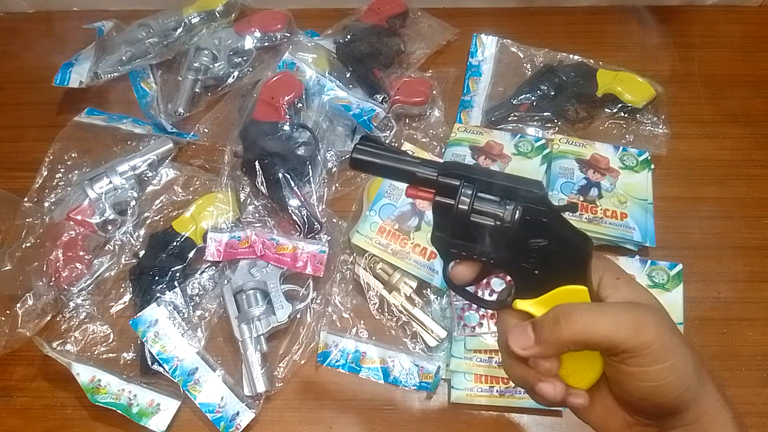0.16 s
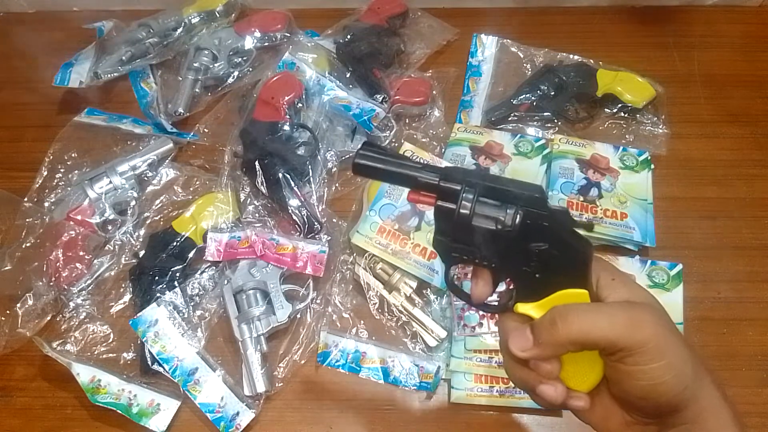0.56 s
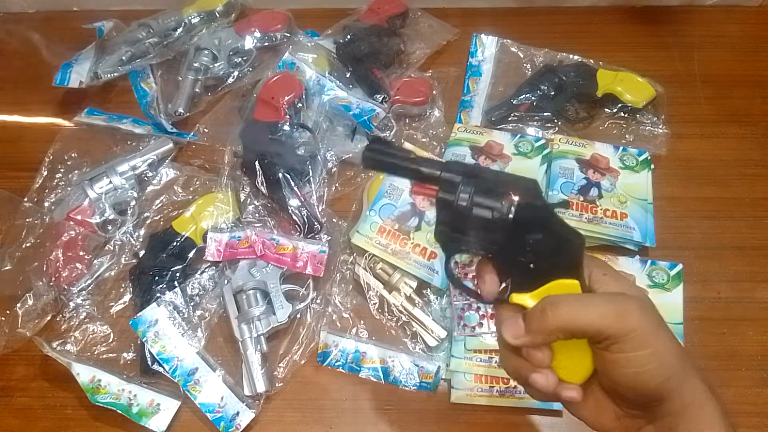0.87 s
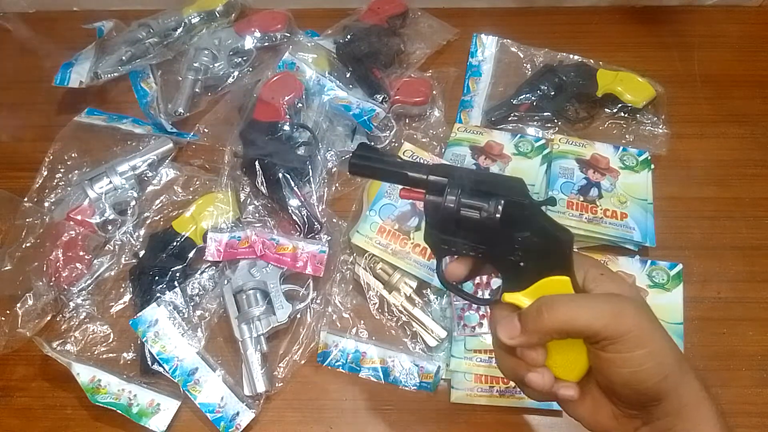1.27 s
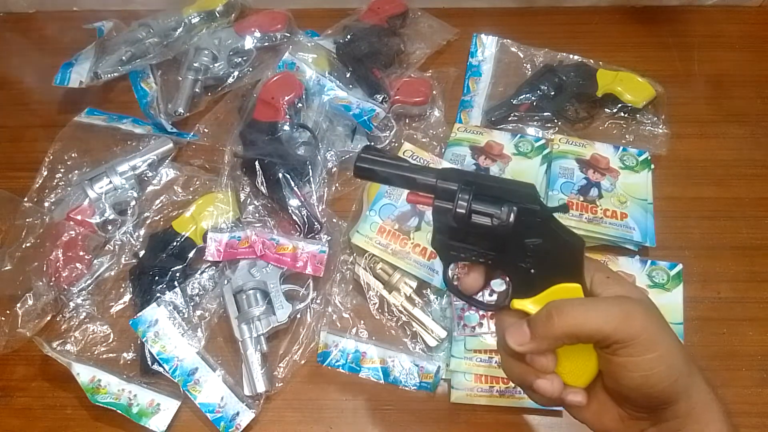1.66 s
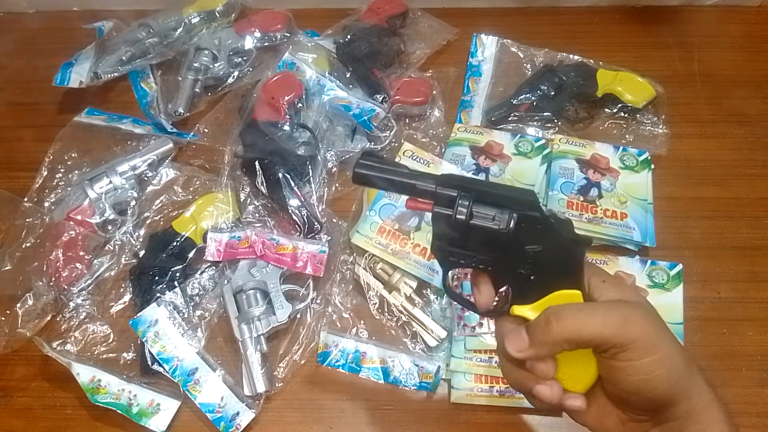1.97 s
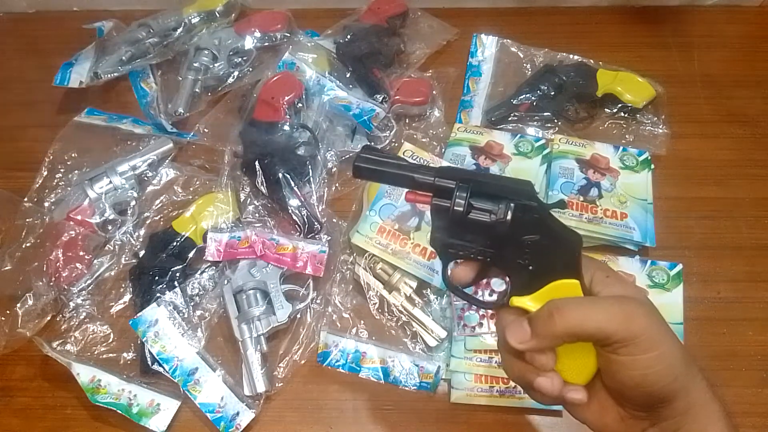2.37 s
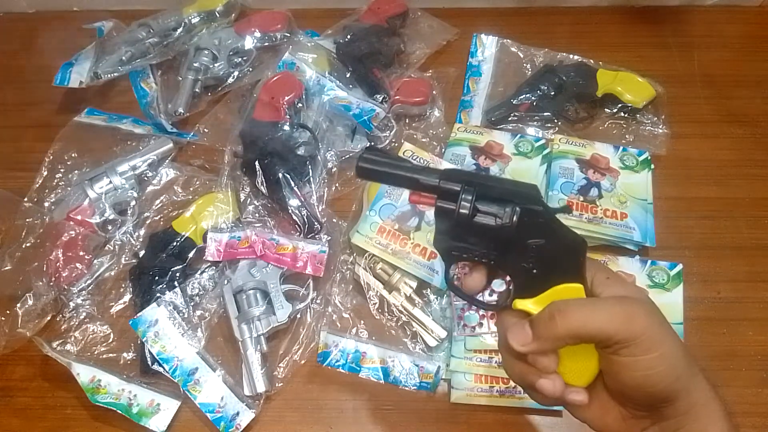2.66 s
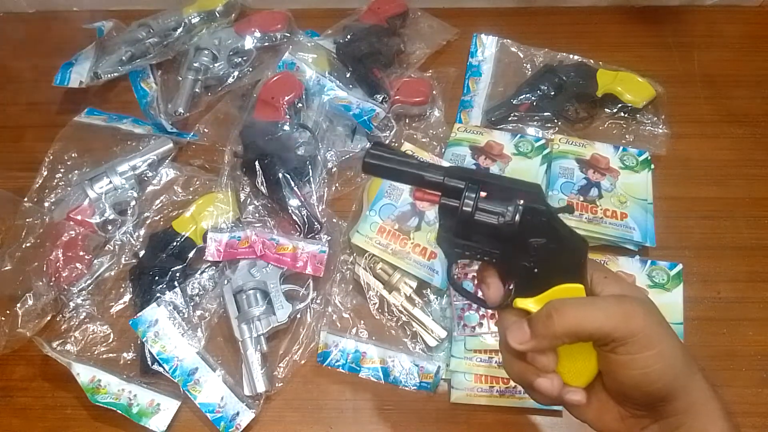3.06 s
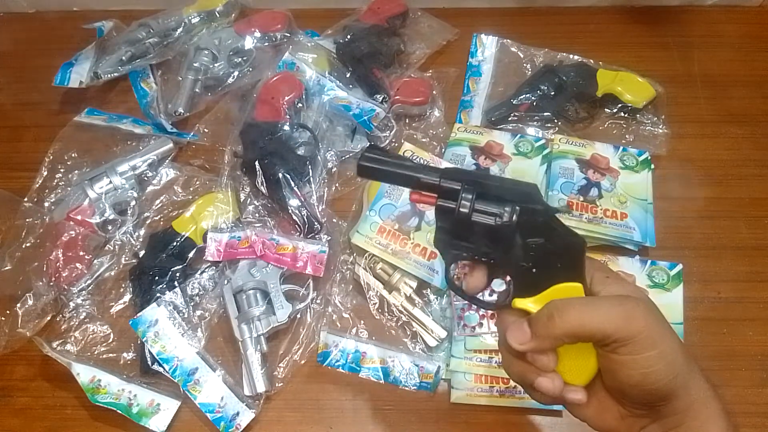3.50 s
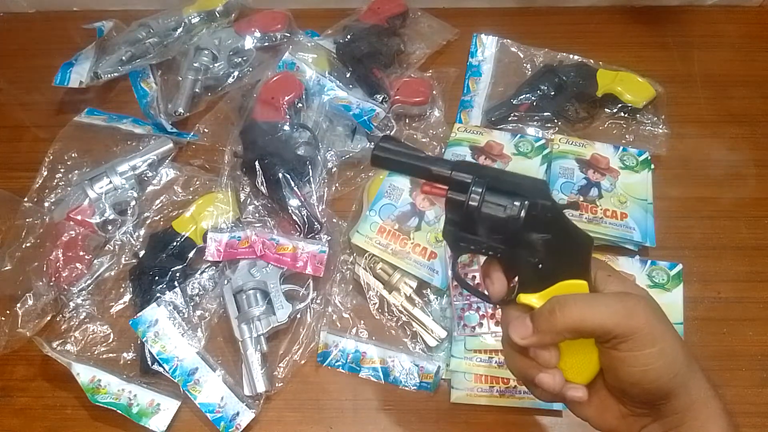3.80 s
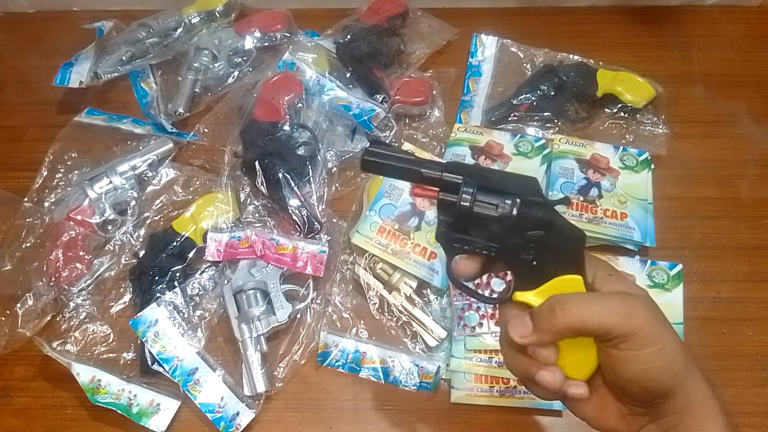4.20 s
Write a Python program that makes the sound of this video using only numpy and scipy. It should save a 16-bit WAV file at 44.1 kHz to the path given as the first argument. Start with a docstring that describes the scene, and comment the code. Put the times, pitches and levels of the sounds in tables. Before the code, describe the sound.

A plastic toy cap revolver fires sharp, hissy bangs about once a second, with trigger clicks between them in a small echoing room.

```python
"""A plastic toy revolver fires ring caps close to the microphone, in a small hard-walled room.
Each cap flares as shaped noise: a sudden one cracks, a slow one swells, and a puff of gas pushes the air.
Hammer, trigger, pawl and cylinder click as struck modes with gritty contact noise; the hand rubs the grip.
The room answers with noise that leaks away band by band; low drone, room noise and faint tones lie beneath."""
import sys
import numpy as np
from scipy import signal
from scipy.fft import rfft, irfft, next_fast_len
from scipy.io import wavfile

SR = 44100
rng = np.random.default_rng(int(sys.argv[2]) if len(sys.argv) > 2 else 0)


def dump_mix(stems):
    """Bounce the given channels to the path in sys.argv[1] as a 16-bit WAV at rate SR."""
    frames = np.atleast_2d(stems).T  # one column per channel
    limited = np.clip(frames, -1, 1)  # hard clip at full scale
    pcm = np.round(limited * 32767).astype(np.int16)
    wavfile.write(sys.argv[1], SR, pcm)


N = 191526

# Spectra give relative levels per Hz; part modes are relative to the strike.
# caps firing: start_s, burn_s, hiss_db, roar_db, suddenness_db (opening burst over hiss), puff_db, puff_hz
CAPS = [(-0.064, 0.079, -32.5, -29.5, 13.5, -35.5, 60), (0.968, 0.055, -27.5, -25, 10, -12, 88),
        (2.1161, 0.11, -30, -22, 4.5, -10.5, 55), (3.148, 0.064, -36, -45.5, 17, -26.5, 68),
        (3.8843, 0.068, -28, -26.5, -0.5, -23, 33.2)]
# flame hiss, which also colours the room's answer: pitch_hz, level_db
HISS = [(200, -24.5), (500, -16), (760, -11), (1000, -3), (2200, -4), (3300, 4), (4300, -3), (6000, 0.5),
        (8200, -2), (9200, -5.5), (10200, -13), (13000, -12), (16000, -9.5)]
# flame roar: pitch_hz, level_db
ROAR = [(150, -18), (310, -7.5), (400, -11.5), (750, -7.5), (1000, -9.5), (1400, -1), (1900, -6),
        (2500, -8.5), (3500, -16), (4500, -20), (8000, -26), (16000, -32)]
# big eddies of the flame: pitch_hz, level_db
RUMBLE = [(20, 2.5), (60, 1), (120, -2), (250, -8), (500, -11), (800, -11.5), (2000, -32.5), (8000, -55)]
# the cap's cup bursting: pitch_hz, level_db
BURST = [(60, -4.5), (140, 3), (230, -13), (420, 3), (750, -13.5), (1200, 5), (1700, -5.5), (3000, -16),
         (8000, -22.5), (16000, -29)]
# hollows of the barrel, drum and grip: pitch_hz, width_hz, lift_db
HOLLOWS = [(457, 41, 2.5), (977, 84, 3), (1300, 340, 0.5), (2340, 150, 1.5), (3596, 180, 2.5),
           (5070, 760, 1), (7400, 320, 0), (7800, 300, 0.5)]
# standing waves of the room: pitch_hz, lift_db
ROOM_MODES = [(281, 4.5), (724, 5.5), (934, 8), (1044, 5.5), (1180, 4.5), (1302, 8), (1400, 4.5),
              (1545, 1.5), (1600, -4), (1784, 1.5), (2154, 10), (2324, 4.5), (2476, 2.5), (2517, 3.5),
              (2906, 1.5), (3088, 3.5), (3288, 3), (3545, 6)]
# the hammer trips: start_s, level_db
HAMMER_TRIPS = [(0.9441, -26), (2.0946, -30), (3.1370, -30.5), (3.8606, -36.5)]
# the hammer and its spring: pitch_hz, level_db, t60_s
HAMMER_MODES = [(2960, -1, 0.021), (3040, -2, 0.014), (4540, -12, .012), (4630, -16, 0.019),
                (6400, -21.5, 0.009), (7700, -20.5, 0.0068)]
# the trigger snaps back: start_s
TRIGGER_S = [0.1338, 1.2103, 2.3713, 3.3624, 4.1171]
# the plastic frame: pitch_hz, level_db, t60_s
FRAME_MODES = [(776, -28.5, 0.033), (1120, -19.5, 0.05), (1325, -22.5, 0.067), (2347, -12, .03),
               (2720, -13.5, 0.043), (3040, -7.5, 0.017), (3476, -13.5, 0.062), (3220, -33, 0.4),
               (3240, -31.5, 0.46), (3510, -34.5, 0.33), (4700, -11.5, 0.02), (7750, -7.5, 0.0085),
               (8030, -12, 0.01)]
# the pawl slides over the ratchet: start_s, level_db
PAWL_SLIPS = [(1.1672, -35.5), (1.887, -66), (2.7452, -63), (3.3064, -31.5), (3.5665, -51.5)]
# the pawl: pitch_hz, level_db, t60_s
PAWL_MODES = [(2600, -3, 0.016), (2980, -7, 0.028), (3420, -14, 0.011), (4400, -14.5, .01)]
# the cylinder locks on the next cap: start_s, level_db
CYLINDER_LOCKS = [(0.6732, -57), (2.8372, -55), (3.6444, -40.5)]
# the cylinder: pitch_hz, level_db, t60_s
CYLINDER_MODES = [(610, -26, 0.014), (1160, -19, 0.026), (2580, -3, 0.033), (2730, -4.5, 0.031),
                  (2680, -22.5, 0.28), (2830, -21.5, 0.018), (4500, -11, 0.016), (6430, -10, 0.0084),
                  (8250, -10, 0.0084)]
# plastic grating on plastic: pitch_hz, level_db
CONTACT = [(200, -29.5), (600, -11.5), (1100, -1), (2000, -2.5), (3000, 7.5), (4500, 0.5), (8300, -4),
           (10300, -18), (16000, -14)]
# the hand rubs on the grip during a slow pull: start_s, length_s, level_db
GRIP_RUBS = [(0.672, 0.3, -67.5), (2.844, 0.365, -73)]
# the rubbing: pitch_hz, level_db
RUB = [(20, 8), (70, 2), (150, -12), (300, -12), (650, -14), (1300, -16), (2000, -27), (3200, -29),
       (5000, -41.5), (16000, -50.5)]
# decay of the room: pitch_hz, t60_s
ROOM_T60 = [(120, 1.02), (400, 0.65), (800, 0.387), (1300, 0.4563), (1900, 0.4769), (2800, 0.3659),
            (3300, 0.375), (4300, 0.41), (8200, 0.368), (11000, 0.4), (16000, 0.18)]
# reverberant sound against the direct: pitch_hz, level_db
ROOM_DB = [(120, -16.5), (400, -13.5), (700, -7), (1000, -5.5), (3000, -2), (8000, 1.5), (16000, 3)]
# faint tones somewhere in the room: start_s, length_s, pitch_hz, level_db
TONES = [(1.317, 0.11, 564, -68.5), (2.893, 0.35, 638, -81)]
# the room's lowest modes: pitch_hz, level_db (relative), t60_s
LOW_MODES = [(67.57, -6.5, .5), (129, -5.5, 0.43), (142, -4, 0.66), (180, -11, 0.48), (219, -18, 0.49)]
# room noise: pitch_hz, level_db
AMBIENCE = [(20, -1), (65, 0), (100, -3.5), (150, -1.5), (200, -11), (260, -18.5), (420, -20), (620, -20.5),
            (1300, -22.5), (1900, -31), (3200, -38.5), (4200, -47), (16000, -56)]

LEAD = SR // 5   # samples run before the take is heard, so the first cap can fire ahead of it
TIME = (np.arange(N + LEAD) - LEAD) / SR
SIZE = next_fast_len(len(TIME), True)
HZ = np.maximum(np.arange(SIZE // 2 + 1) * SR / SIZE, 1)

CRACK_DB, CRACK_DB_PER_DB = -10, 0.7843   # crack over the flame at suddenness 0, and its growth
RUMBLE_DB, RUMBLE_DB_PER_DB = 3.5, .25   # eddies over the roar at puff level 0 dB, and their growth
PUFF_SWELL_CYCLES, PUFF_EARLY_S = 0.24, 0.0026   # time to the swell's peak; start ahead of the crack
IGNITION_S, HAMMER_FALL_DB = .0037, -33.5   # the hammer lands this long before each cap fires
TRIGGER_DB = -22   # always the force of its spring
PAWL_LEAD_S, PAWL_LEAD_DB = 0.043, -3.5   # the pawl brushes the tooth before, relative to its drop
PAWL_BOUNCE_S, PAWL_BOUNCE_DB = 0.0076, -2   # and bounces once
CATCH_LEAD_S, CATCH_DB = 0.0039, -15   # the catch grazes the cylinder before it locks
GRIP_EDGE_S = 0.015
MODE_WIDTH_HZ = 13   # of the room's standing waves
BACKGROUND_DB = -69.5   # rms of the steady room noise
CUTOFF_HZ = 16000


def from_db(db):
    """Decibels to gain."""
    return 10 ** (np.asarray(db) / 20)


def at_hz(points, hz):
    """Read a table on a log-frequency axis."""
    f, value = np.transpose(points)
    return np.interp(np.log(np.maximum(hz, 1)), np.log(f), value)


def noise(gain):
    """Steady noise of rms 1 with a given gain at each frequency."""
    shaped = rfft(rng.standard_normal(SIZE)) * gain
    x = irfft(shaped, SIZE)[:len(TIME)]
    return x / np.sqrt(np.mean(x ** 2) + 1e-20)


def coloured(spectrum, lift=1):
    """Noise of rms 1 with a tabled spectrum, times an extra gain by frequency."""
    return noise(lift * from_db(at_hz(spectrum, HZ)))


def dying(start, t60):
    """Envelope that jumps to 1 and falls 60 dB in t60 seconds."""
    age = TIME - start
    return (age >= 0) * np.exp(-np.clip(age * np.log(1000) / t60, 0, 40))


def held(start, length, edge_s):
    """Envelope that fades in, holds at 1 and fades out."""
    to_nearest_end = np.minimum(TIME - start, start + length - TIME)
    return np.clip(to_nearest_end / edge_s, 0, 1)


def resonances():
    """Gain by frequency of the gun's hollows and the room's narrow standing waves."""
    bumps = HOLLOWS + [(hz, MODE_WIDTH_HZ, db) for hz, db in ROOM_MODES]
    return from_db(sum(db / (1 + (2 * (HZ - hz) / width) ** 2) for hz, width, db in bumps))


def flares(lift, crack_t60, fade_t60, sputter_db, burst_t60, rumble_t60):
    """A cap bursts, then its flame hisses and roars out of the cylinder until the powder is spent."""
    hiss, roar = coloured(HISS, lift), coloured(ROAR, lift)
    rumble, burst = coloured(RUMBLE, lift), coloured(BURST, lift)
    sputter = from_db(sputter_db * noise(HZ < 300))
    out = 0
    for s, burn, hiss_db, roar_db, sudden_db, puff_db, _ in CAPS:
        crack_db = CRACK_DB + CRACK_DB_PER_DB * sudden_db
        burst_db = hiss_db + sudden_db
        # a stronger puff stirs more eddies
        rumble_db = roar_db + RUMBLE_DB + RUMBLE_DB_PER_DB * puff_db
        burning = (TIME >= s) & (TIME < s + burn)
        flame = sputter * burning + dying(s + burn, fade_t60)
        # above 0 dB the flame opens with a crack, below it swells up
        flame = flame * (1 + (from_db(crack_db) - 1) * dying(s, crack_t60))
        # the big eddies are spent first
        eddies = from_db(rumble_db) * dying(s, rumble_t60) * rumble
        out = out + flame * (from_db(hiss_db) * hiss + from_db(roar_db) * roar + eddies)
        out = out + from_db(burst_db) * dying(s, burst_t60) * burst
    return out


def puffs():
    """Expanding gas pushes on the microphone just ahead of the crack, and a suction follows."""
    out = 0
    for s, *_, db, hz in CAPS:
        cycles = np.clip(TIME - s + PUFF_EARLY_S, 0, .5) * hz
        swell = cycles / PUFF_SWELL_CYCLES
        envelope = swell * np.exp(1 - swell)
        out = out + from_db(db) * envelope * np.sin(2 * np.pi * cycles)
    return out


def ring(force, hz, t60):
    """Damped resonator: a unit click sets a sine ringing from height 1."""
    r = np.exp(-np.log(1000) / (t60 * SR))
    w = 2 * np.pi * hz / SR
    return signal.lfilter([0, np.sin(w)], [1, -2 * r * np.cos(w), r * r], force + 1e-18)


def strikes(events, modes, grit_db, grit_t60):
    """Each contact rings the part's modes, with a brief gritty chatter of plastic on plastic."""
    times, levels = np.transpose(events)
    at = np.round(times * SR).astype(int) + LEAD
    # every mode is struck about 1 dB harder or softer each time
    strengths = from_db(levels[:, None] + rng.standard_normal((len(events), len(modes))))
    chatter = sum(from_db(db) * dying(s, grit_t60) for s, db in events)
    out = from_db(grit_db) * coloured(CONTACT) * chatter
    for k, (hz, db, t60) in enumerate(modes):
        force = np.zeros(len(TIME))
        # neighbouring modes swing in opposite senses
        force[at] = strengths[:, k] * from_db(db) * (-1) ** k
        out = out + ring(force, hz, t60)
    return out


def hammer_blows():
    """The hammer trips, and lands just before each cap fires."""
    falls = [(s - IGNITION_S, HAMMER_FALL_DB) for s, *_ in CAPS]
    return list(HAMMER_TRIPS) + falls


def trigger_snaps():
    """The spring throws the trigger back against the frame with the same force each time."""
    return [(s, TRIGGER_DB) for s in TRIGGER_S]


def pawl_ticks():
    """Each slip of the pawl is a light brush, the drop itself and a bounce."""
    run = [(-PAWL_LEAD_S, PAWL_LEAD_DB), (0, 0), (PAWL_BOUNCE_S, PAWL_BOUNCE_DB)]
    return [(s + later_s, db + softer_db) for s, db in PAWL_SLIPS for later_s, softer_db in run]


def cylinder_clicks():
    """The catch grazes the cylinder, then drops into its notch."""
    grazes = [(s - CATCH_LEAD_S, db + CATCH_DB) for s, db in CYLINDER_LOCKS]
    return grazes + list(CYLINDER_LOCKS)


def grip():
    """Dull rubbing of the hand as it squeezes against the spring."""
    rubs = sum(from_db(db) * held(s, length, GRIP_EDGE_S) for s, length, db in GRIP_RUBS)
    return coloured(RUB) * rubs


def room(x, lift, delay_s):
    """Diffuse field: each band stores the energy fed to it and lets it leak away as noise."""
    edges = np.geomspace(500, 17400, 25) - 400
    late = np.interp(TIME - delay_s, TIME, x)
    out = 0
    for low, high in zip(edges, edges[1:]):
        centre = (low + high) / 2
        bandpass = signal.butter(4, [low, high], "band", fs=SR, output="sos")
        fed = signal.sosfilt(bandpass, late + 1e-18) ** 2
        keep = np.exp(-2 * np.log(1000) / (at_hz(ROOM_T60, centre) * SR))
        stored = signal.lfilter([1 - keep], [1, -keep], fed)
        # neighbouring bands overlap
        band = np.sqrt(np.maximum(1 - abs(HZ - centre) / (high - low), 0))
        out = out + from_db(at_hz(ROOM_DB, centre)) * np.sqrt(stored) * coloured(HISS, band * lift)
    return out


def tones(edge_s, width_hz):
    """Soft wavering tones, each a narrow band of noise that fades in and out."""
    out = 0
    for s, length, hz, db in TONES:
        wavering = noise(1 / (1 + ((HZ - hz) / width_hz) ** 2))
        out = out + from_db(db) * held(s, length, edge_s) * wavering
    return out


def background(drone_db, boom_db, boom_t60):
    """Low room noise, droning in the lowest modes; each bang sets those modes booming too."""
    drone = sum(from_db(db) * noise(1 / (1 + ((HZ - hz) * t60 / 2) ** 2)) for hz, db, t60 in LOW_MODES)
    boom = from_db(boom_db) * sum(dying(s, boom_t60) for s, *_ in CAPS)
    return from_db(BACKGROUND_DB) * (coloured(AMBIENCE) + (from_db(drone_db) + boom) * drone)


def scene():
    """The gun close by and the room around it, one microphone feeding both channels."""
    lift = resonances()
    bangs = flares(lift, crack_t60=.06, fade_t60=0.11, sputter_db=0.33, burst_t60=.03, rumble_t60=.45)
    hammer = strikes(hammer_blows(), HAMMER_MODES, grit_db=-18.0, grit_t60=.034)
    trigger = strikes(trigger_snaps(), FRAME_MODES, grit_db=-4.5, grit_t60=0.02)
    pawl = strikes(pawl_ticks(), PAWL_MODES, grit_db=-10.5, grit_t60=0.024)
    cylinder = strikes(cylinder_clicks(), CYLINDER_MODES, grit_db=-16.5, grit_t60=0.074)
    direct = bangs + puffs() + hammer + trigger + pawl + cylinder + grip()
    # the lock's clicks reach the room more weakly than the open flare
    sent = bangs + from_db(-3.5) * (hammer + pawl)
    sent = sent + from_db(-4.0) * trigger + from_db(-6.5) * cylinder
    mono = direct + room(sent, lift, delay_s=0.0043)
    mono = mono + tones(edge_s=0.015, width_hz=16)
    mono = mono + background(drone_db=-2, boom_db=11.5, boom_t60=1.8)
    return np.tile(mono[LEAD:], (2, 1))


def record(dry):
    """The loudest peaks are rounded, the signal rests slightly off zero, and the top is cut."""
    top, offset = .6, .0026   # of full scale
    rounded = top * np.tanh(dry / top)
    lowpass = signal.ellip(10, .2, 70, CUTOFF_HZ, fs=SR, output="sos")
    return offset + signal.sosfilt(lowpass, rounded)


dry = scene()
out = record(dry)
dump_mix(out)
```